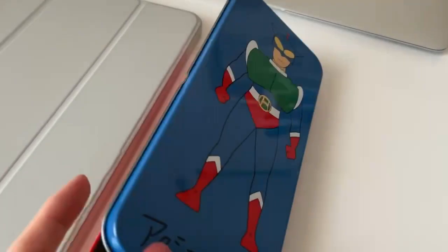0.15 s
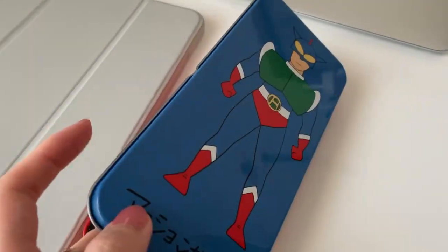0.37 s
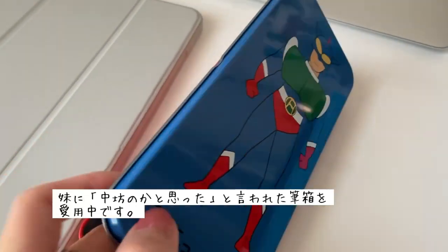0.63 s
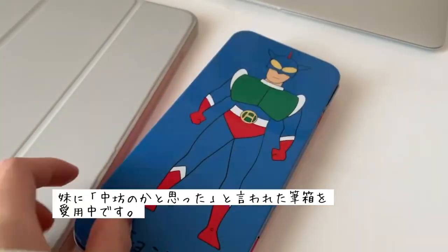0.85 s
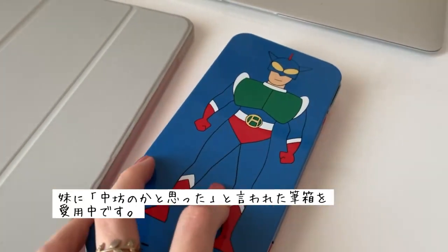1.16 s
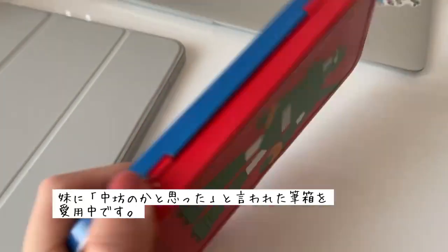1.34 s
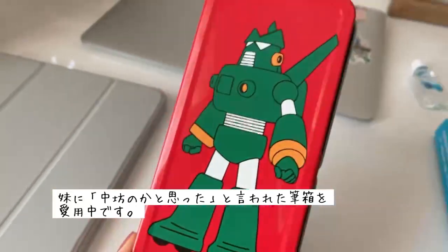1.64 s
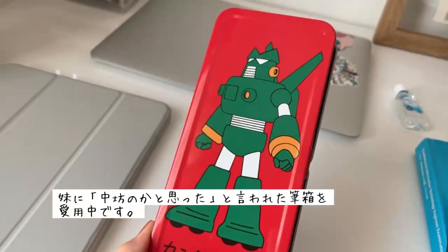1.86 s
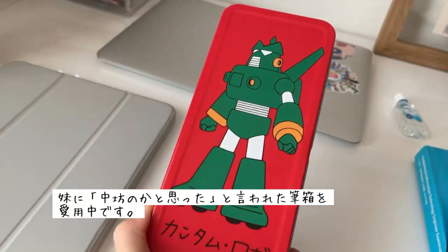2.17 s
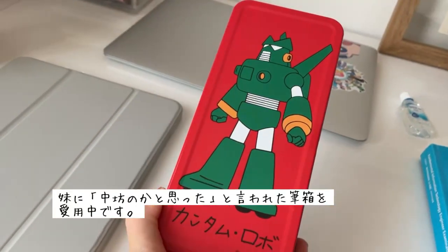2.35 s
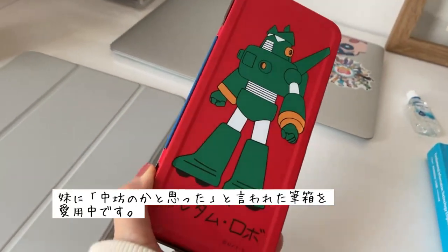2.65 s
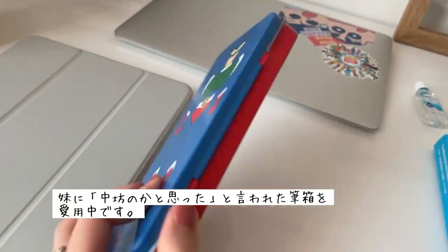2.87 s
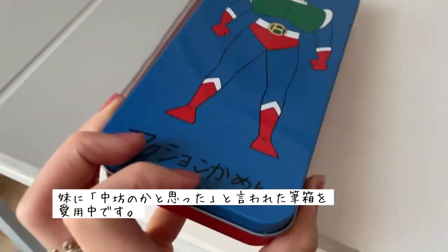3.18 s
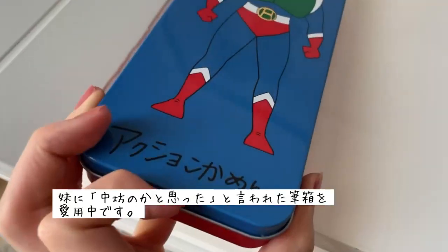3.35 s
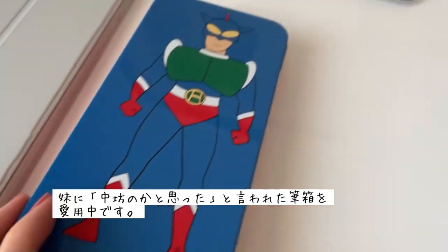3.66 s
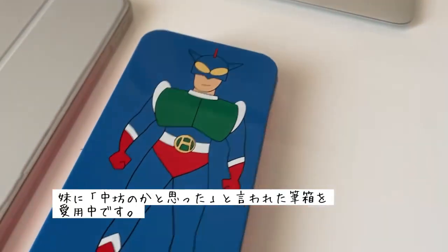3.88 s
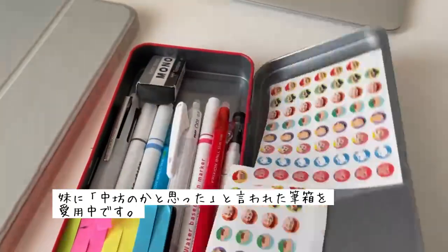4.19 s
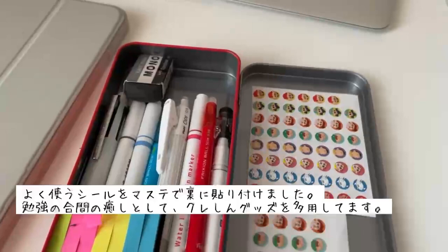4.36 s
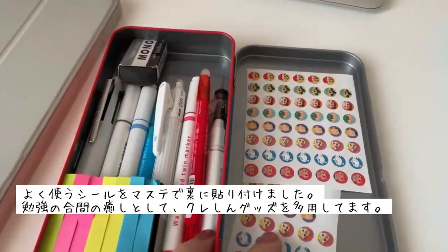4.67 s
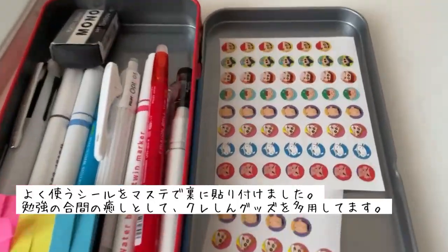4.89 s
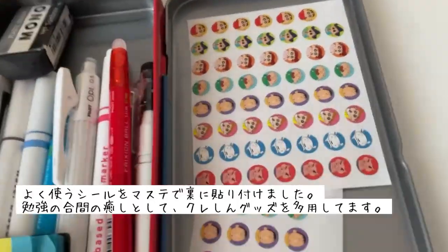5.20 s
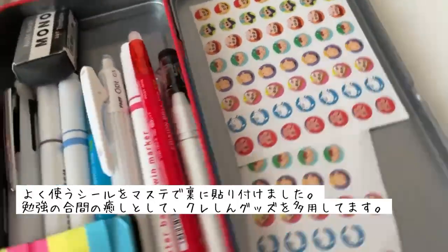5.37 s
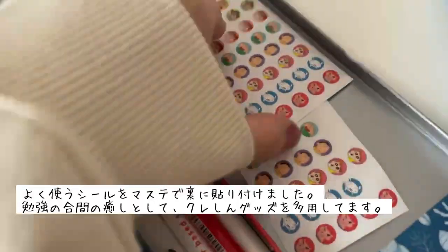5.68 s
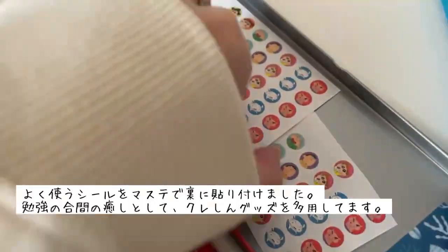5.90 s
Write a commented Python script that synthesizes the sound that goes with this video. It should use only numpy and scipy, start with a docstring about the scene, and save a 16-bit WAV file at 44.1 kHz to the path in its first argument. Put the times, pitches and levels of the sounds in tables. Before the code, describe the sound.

In a small quiet room, very close to a phone microphone, a thin metal pencil tin is closed with a light clack. Fingers bump and rub it, then loose pens tumble hollowly inside as it is flipped twice, with a quiet pause between. It lands on the desk with a strong knock, then opens with bright clacks and ticks, followed by faint paper rubbing and one last sharp lid clack.

```python
"""A sheet-metal pencil tin is shut, turned over twice, put down on a desk and opened, close to a phone.
Shut, it knocks hollowly as the pens tumble; open, its lid and rim clack brightly.
Each blow is a burst of noisy contact force that rings the damped modes of the panels.
Fingers tap and rub the metal, stirring the pens; paper slides over it: noise shaped by uneven slips.
The small quiet room adds a short decaying noise tail and a faint rumble of coloured noise."""
import sys
import numpy as np
from scipy import signal
from scipy.fft import rfft, irfft
from scipy.io import wavfile
from scipy.ndimage import uniform_filter1d

SR = 44100
rng = np.random.default_rng(int(sys.argv[2]) if len(sys.argv) > 2 else 0)


def dump_mix(stems):
    """Bounce the given channels to the path in sys.argv[1] as a 16-bit WAV at rate SR."""
    frames = np.atleast_2d(stems).T  # one column per channel
    limited = np.clip(frames, -1, 1)  # hard clip at full scale
    pcm = np.round(limited * 32767).astype(np.int16)
    wavfile.write(sys.argv[1], SR, pcm)


N = 265923


def undb(db):
    """Decibels to gain."""
    return 10 ** (np.asarray(db) / 20)


def unit(x):
    """Scale to rms 1."""
    return x / np.sqrt(np.mean(x ** 2) + 1e-20)


def band(x, lo_hz, hi_hz, order=2):
    """Causal band-pass."""
    edges_hz = [lo_hz, min(hi_hz, .48 * SR)]
    return signal.sosfilt(signal.butter(order, edges_hz, "band", fs=SR, output="sos"), x)


def on_bins(hz, values, count):
    """Points joined on a log-frequency axis, one value per FFT bin."""
    bins_hz = np.fft.rfftfreq(count, 1 / SR)
    return np.interp(np.log(bins_hz + 1), np.log(hz), values)


def colour(x, points):
    """Weight the spectrum by a curve through (frequency [Hz], level [dB]) points; rms 1."""
    gain = undb(on_bins(*np.transpose(points), N))
    return unit(irfft(rfft(x) * gain, N))


def pair(count, apart_db):
    """Noise at two ports: a shared part and a part of opposite sign."""
    mid, side = rng.standard_normal((2, count))
    return mid + undb(apart_db) * side * np.array([[1], [-1]])


def add(out, start_s, db, sound):
    """Mix a sound in at its moment and level."""
    start = int(start_s * SR)
    part = sound[:, :N - start]
    out[:, start:start + part.shape[1]] += undb(db) * part


# room rumble spectrum: (frequency [Hz], relative level [dB])
RUMBLE_SPECTRUM = [(15, -8.5), (30, -9), (50, -3), (68, 7.5), (100, -6), (150, -15.5), (300, -24.5),
                   (600, -35), (2000, -43.5), (8000, -51.5), (16000, -59)]
RUMBLE_DB = -59


def rumble():
    """Steady noise, weighted to the lows, nearly alike at both ports."""
    return undb(RUMBLE_DB) * colour(pair(N, apart_db=-13.0), RUMBLE_SPECTRUM)


def friction(grain_db, catch_db, apart_db):
    """Noise whose level steps with tiny uneven slips and wavers as the surfaces catch, some 55 times a second."""
    slips = np.repeat(rng.exponential(size=N // 40 + 1), 40)[:N]
    catches = np.repeat(rng.standard_normal(N // 800 + 1), 800)
    catches = uniform_filter1d(catches, 300)[:N]
    level_db = grain_db * np.minimum(slips, 5) + catch_db * catches
    return pair(N, apart_db) * undb(level_db)


def strokes(starts_s, lengths_s, levels_db, attack_s, release_s):
    """Gain of movements that swell, hold and fade; attack and release each span 30 dB."""
    t = np.arange(0, N, 64) / SR
    gain = 0
    for start_s, length_s, db in zip(starts_s, lengths_s, levels_db):
        before = np.maximum((start_s - t) / attack_s, 0)
        after = np.maximum((t - start_s - length_s) / release_s, 0)
        gain = np.maximum(gain, undb(db - 30 * (before + after)))
    return np.interp(np.arange(N) / SR, t, gain)


# sliding spectrum: (frequency [Hz], relative level [dB])
SLIDE_SPECTRUM = [(1000, -13.5), (1900, 2.5), (3000, 1.5), (4200, 1), (6000, -2.5), (8000, -2),
                  (11000, -5.5), (13500, -7.5), (14500, -15)]
# paper and sleeve sliding over the metal: (start [s], length [s], level [dB])
SLIDES = [(.01, 0.18, -63), (0.312, .04, -65), (0.68, 0.34, -76), (1.439, 0.084, -47.5), (4.2, 0.1, -53),
          (4.406, 0.022, -47.5), (4.712, 0.033, -69.5), (5.481, .1, -55), (5.604, 0.17, -71.5),
          (5.947, 0.066, -74)]


def sliding():
    """Paper and sleeve rub the metal: friction noise plus tiny ticks of snagging fibres."""
    snags_per_s = 220
    snags = (rng.random(N) < snags_per_s / SR) * rng.standard_normal(N)
    rubbing = unit(friction(grain_db=1.5, catch_db=1.2, apart_db=-8.5))
    slide = colour(rubbing + undb(-15) * unit(snags), SLIDE_SPECTRUM)
    return slide * strokes(*np.transpose(SLIDES), attack_s=.16, release_s=0.11)


def chatter(t, rise_s, t60_s, quickening, grain_db):
    """Contact force: builds, then fades unevenly, dropping faster and faster towards its end."""
    swell = np.minimum(t / max(rise_s, 1e-4), 1)
    age = np.maximum(t - rise_s, 0) / t60_s
    steps = np.repeat(rng.standard_normal(len(t) // 32 + 1), 32)[:len(t)]
    unevenness = undb(grain_db * steps)
    fade = undb(-60 * (age + quickening * age ** 2))
    return pair(len(t), apart_db=-10.5) * unevenness * swell * fade


def ring(force, modes, ring_db, damping):
    """Force through a panel: the direct crack plus modes whose shares depend on the spot."""
    t = np.arange(SR // 12) / SR
    hz, t60_s, db = np.transpose(modes)[:, :, None]
    spot, detune = rng.standard_normal((2, len(modes), 1))
    # hand and contents damp every mode by 60 dB within 100 cycles
    decay_per_s = np.log(1000) * np.maximum(damping / t60_s, hz / 100)
    size = undb(db + ring_db + 2 * spot) * 2 * decay_per_s / SR
    waves = np.cos(2 * np.pi * hz * (1 + 0.012 * detune) * t)
    response = np.sum(size * np.exp(-decay_per_s * t) * waves, axis=0)
    response[0] += 1  # direct crack
    return signal.fftconvolve(force, response[None])[:, :force.shape[1]]


def shimmer(x, dense_db, t60_s):
    """Countless weak modes of thin sheet: a short dense ring that differs from spot to spot."""
    t = np.arange(SR // 30) / SR
    dense = unit(rng.standard_normal(len(t)) * undb(-60 * t / t60_s))
    response = undb(dense_db) * dense / np.sqrt(len(t))
    response[0] += 1
    return signal.fftconvolve(x, response[None])[:, :x.shape[1]]


# tin and desk moving together: (frequency [Hz], t60 before damping [s], level before ring gain [dB])
DESK_MODES = [(91, 0.028, -2.5), (140.4, 0.21, 10.5), (243, 0.038, -4), (324, 0.012, 1.5)]


def knock(modes, ring_db, damping, rise_s, t60_s, body_hz, thump_db, clack_db, tick_db):
    """One blow: hollow body, panel clack, contact tick and a slower low thump; dB relative to body."""
    t = np.arange(SR // 7) / SR
    force = chatter(t, rise_s, t60_s, quickening=.09, grain_db=2.6)
    metal = ring(force, modes, ring_db, damping)
    bright = shimmer(metal, dense_db=-4, t60_s=.012)
    body = band(metal, 280, 2200, order=3)
    body = band(body, body_hz / 1.32, body_hz * 1.427, order=1)
    clack = band(bright, 1550, 3700, order=3)
    tick = band(bright.mean(axis=0), 4800, 23000, order=3)
    tick = band(tick, 1800, 4200, order=1)
    # tin, hand and desk move as a whole, more slowly
    push = chatter(t, rise_s + 0.0044, t60_s + 0.022, quickening=.22, grain_db=2)
    thump = band(ring(push, DESK_MODES, ring_db=8.0, damping=0.98), 50, 300)
    parts = unit(body) + undb(thump_db) * unit(thump)
    parts += undb(clack_db) * unit(clack) + undb(tick_db) * unit(tick)
    return parts * np.sqrt(SR / 100 / len(t))  # body energy equals rms 1 over 10 ms


def on_desk(blows, strike):
    """Blows to the tin resting on the desk: the stronger the thump, the lower the body."""
    body_hz_at_0db_thump, thump_db_per_octave = 667, 43.5
    out = np.zeros((2, N))
    for start_s, db, rise_s, t60_s, thump_db, clack_db, tick_db in blows:
        body_hz = body_hz_at_0db_thump * 2 ** (-thump_db / thump_db_per_octave)
        add(out, start_s, db, strike(rise_s, t60_s, body_hz, thump_db, clack_db, tick_db))
    return out


# open panels: (frequency [Hz], t60 before damping [s], level before ring gain [dB])
OPEN_MODES = [(533, 0.038, 8.5), (741, 0.099, 2), (1110, .06, -0.5), (1174, 0.02, 6.5), (2090, 0.15, -1.5),
              (2030, 0.024, 2), (2426, 0.009, 7.5), (2662, 0.05, 11.5), (2973, 0.016, 6),
              (3470, 0.034, 5.5), (4607, 0.045, 3), (5575, 0.049, -1), (6600, 0.038, 5.5),
              (7300, 0.026, -1.5), (7900, .02, -6), (9910, 0.014, 1.5), (11100, 0.025, -45),
              (11900, 0.023, -17.5), (14700, .015, 14.5)]


def open_knock(rise_s, t60_s, body_hz, thump_db, clack_db, tick_db):
    """Blow on the open tin: lying on the desk, it rings less."""
    return knock(OPEN_MODES, 4, 1.4, rise_s, t60_s, body_hz, thump_db, clack_db, tick_db)


# lid and rim of the open tin: (time [s], body level over 10 ms [dB], force rise [s], force t60 before
# quickening [s], thump [dB re body], clack [dB re body], tick [dB re body])
LID_CLACKS = [(.047, -47.5, 0.0016, 0.064, 7.5, 6, -2.5), (0.1723, -50.5, 0.0006, 0.082, 8.5, -5.5, -9),
              (.307, -31.5, 0.011, 0.027, -5.5, -1.5, -4.5), (.326, -37, 0.011, 0.032, -3, 1.5, -3.5),
              (4.06, -37.5, 0.0029, 0.11, 2, -7.5, -13), (4.131, -38, 0.0031, 0.086, -13.5, -4, -1.5),
              (4.148, -39, 0.0095, 0.042, 1, -15, -26), (4.204, -48, 0.0024, 0.061, 9, 10, 5),
              (4.336, -38.5, 0.00017, 0.065, -0.5, 7.5, 3), (4.4876, -30, 0.00098, 0.035, -9, 11, 0.5),
              (4.584, -49.5, 0.00061, 0.025, -6, 3, -2.5), (4.6002, -30.5, 0.00023, 0.063, -7, 8.5, -2),
              (4.6171, -35, .0005, 0.039, 0.5, 10, -2), (5.782, -44.5, 0.0057, .028, -12.5, 2, -13),
              (5.7899, -25, 0.00037, 0.042, -6.5, 10, 5.5), (5.809, -39, 0.0023, .049, 0, 5, 1),
              (5.8396, -49.5, 0.002, 0.1, -3, -1, -11), (5.8745, -51, 0.0079, 0.082, -9, 5.5, -3),
              (6.005, -64, .007, 0.19, -9, 11.5, -1)]


def lid_clacks():
    """Lid and rim meet and ring the open panels."""
    return on_desk(LID_CLACKS, open_knock)


# hinge, pen clips, sticker sheet: (time [s], level before body offset [dB], force t60 before quickening [s])
TICKS = [(0.1081, -40.5, 0.021), (.1407, -40.5, 0.032), (0.7723, -51, 0.042), (4.1874, -41, 0.041),
         (4.2828, -49, 0.0044), (4.303, -35, 0.0027), (4.32, -48.5, 0.0033), (4.4247, -44.5, 0.0086),
         (4.448, -49, 0.03), (5.2969, -57.5, 0.11), (5.4223, -55, 0.051), (5.5617, -52, 0.046),
         (5.6014, -51, 0.011)]
TICK_BODY_OFFSET_DB = -13


def ticks():
    """Light, hard contacts that hardly move the body of the tin or ring its panels."""
    out = np.zeros((2, N))
    for start_s, db, t60_s in TICKS:
        tick = knock(OPEN_MODES, ring_db=-8.5, damping=1.4, rise_s=0.00087, t60_s=t60_s,
                     body_hz=740, thump_db=4, clack_db=11.5, tick_db=12)
        add(out, start_s, db + TICK_BODY_OFFSET_DB, tick)
    return out


# shut panels: (frequency [Hz], t60 before damping [s], level before ring gain [dB])
SHUT_MODES = [(484, 0.03, 3.5), (454, 0.021, -0.5), (631, 0.014, -5.5), (747, 0.042, 1.5),
              (886, 0.076, -3.5), (1000, 0.086, -6), (1110, 0.03, -1), (1452, 0.063, -0.5),
              (1870, 0.079, -4), (1975, 0.047, -3), (2120, 0.028, 6), (2366, .045, 5.5), (2510, 0.017, 6.5),
              (2890, 0.057, -1), (3690, 0.098, -3), (4270, .03, -5.5), (4960, 0.047, -2),
              (6120, 0.079, -2.5), (9600, 0.0022, -4.5), (11880, 0.06, -6.5), (12560, 0.011, -0.5),
              (15400, 0.0036, 6.5)]


def shut_knock(rise_s, t60_s, body_hz, thump_db, clack_db, tick_db):
    """Blow on the shut tin: its panels ring more freely."""
    return knock(SHUT_MODES, 7, 1.25, rise_s, t60_s, body_hz, thump_db, clack_db, tick_db)


def jostle(rub_gain):
    """Loose pens nudge the tin at random moments, as strongly as the hand rubs it."""
    nudges, db_re_rub = 36, 3.5
    out = np.zeros((2, N))
    for when in rng.random(nudges):
        nudge = shut_knock(rise_s=.002, t60_s=.05, body_hz=750, thump_db=-7, clack_db=-7.5, tick_db=-14.5)
        add(out, when * N / SR, db_re_rub, rub_gain[int(when * N)] * nudge)
    return out


# hand takes hold and shifts the tin: (start [s], length [s], soft bumping [dB], finger rubbing [dB])
GRIPS = [(0.147, 0.097, -59, -65), (0.704, 0.12, -59, -68.5), (.83, .05, -54.5, -62),
         (0.931, 0.057, -40, -48.5), (1.1, 0.044, -52, -76), (1.187, 0.13, -55.5, -80),
         (1.303, 0.3, -56, -50), (1.627, 0.13, -77, -76), (2.79, 0.067, -79.5, -74.5),
         (2.873, 0.19, -58.5, -56), (3.066, 0.23, -58.5, -49), (3.558, 0.35, -62.5, -61.5),
         (3.869, 0.074, -58, -62.5), (3.997, 0.12, -56.5, -51), (4.229, 0.18, -59.5, -57.5),
         (4.633, 0.2, -68, -83), (5.308, 0.049, -57, -70.5), (5.428, .09, -67.5, -70.5),
         (5.566, 0.056, -51, -57), (5.949, 0.07, -69.5, -70)]


def gripping():
    """The hand bumps the tin as a whole, rubs its panels by friction and stirs the pens."""
    starts_s, lengths_s, *levels_db = np.transpose(GRIPS)
    bump_gain, rub_gain = (strokes(starts_s, lengths_s, db, attack_s=0.044, release_s=0.035)
                           for db in levels_db)
    bump_force = friction(grain_db=0, catch_db=2.0, apart_db=-16.5)
    bump = unit(band(ring(bump_force, DESK_MODES, ring_db=1.5, damping=2.4), 61, 320))
    rub_force = friction(grain_db=2, catch_db=4.0, apart_db=-6.5)
    rub = unit(band(ring(rub_force, SHUT_MODES, ring_db=5.5, damping=1.), 260, 1250, order=3))
    return bump * bump_gain + rub * rub_gain + jostle(rub_gain)


# soft fingertips landing: (time [s], body level over 10 ms [dB], force t60 before quickening [s])
TAPS = [(0.7007, -66.5, 0.069), (0.8341, -58, .07), (1.0543, -50.5, 0.19), (1.126, -57.5, .035),
        (1.187, -60.5, 0.025), (1.229, -53, 0.081), (1.734, -63.5, 0.054), (2.7779, -63.5, 0.056),
        (3.398, -65, .085), (3.928, -48, 0.11), (4.0164, -52, 0.046), (5.2968, -60, 0.16),
        (5.5606, -54.5, 0.081), (5.9613, -61, 0.037)]


def taps():
    """Soft fingertips land on the tin: mostly thump, little metal."""
    out = np.zeros((2, N))
    for start_s, db, t60_s in TAPS:
        tap = shut_knock(rise_s=.0018, t60_s=t60_s, body_hz=557, thump_db=5.5, clack_db=-11.5, tick_db=-19)
        add(out, start_s, db, tap)
    return out


# shut tin pressed and set down: (time [s], body level over 10 ms [dB], force rise [s], force t60 before
# quickening [s], thump [dB re body], clack [dB re body], tick [dB re body])
DESK_BLOWS = [(.917, -31.5, .0046, 0.15, -27, -8, -15.5), (.947, -35, .001, 0.13, -7.5, -4, -9.5),
              (1.0815, -30, 0.00085, 0.025, -5.5, -2, -10), (3.641, -34.5, .0016, .047, -4.5, 1.5, -10),
              (3.785, -31.5, .0004, 0.068, -28, -5, -24.5), (3.791, -21, .0056, .067, -8.5, -4.5, -16.5),
              (3.8085, -9.5, .0022, .053, -9, -4.5, -8), (3.826, -22.5, .0033, 0.013, -7.5, -1.5, -4.5)]


def desk_blows():
    """The shut tin knocks as it is pressed and set down on the desk."""
    return on_desk(DESK_BLOWS, shut_knock)


# pens hitting the shut tin turned in the air: (time [s], body level over 10 ms [dB], force rise [s],
# force t60 before quickening [s], body centre [Hz], hardness [dB])
PEN_HITS = [(1.306, -28.5, 0.0094, .05, 685, -2), (1.326, -31.5, 0.0025, 0.18, 840, -1),
            (1.357, -36.5, 0.0055, .015, 945, 13.5), (1.374, -40, 0.0016, 0.17, 559.6, -3.5),
            (1.418, -39, 0.0069, .14, 640, 1), (1.463, -28.5, 0.0075, .07, 600, -3),
            (1.478, -22.5, 0.013, .065, 704, -3), (1.501, -24, .005, 0.033, 897, -1.5),
            (1.5076, -13, 0.00091, .055, 993.6, 3), (1.528, -21.5, .009, .018, 857.5, -0.5),
            (1.559, -41, 0.0014, .065, 660, 0), (1.629, -37.5, 0.0015, .09, 961, -1),
            (2.2803, -57, 0.00099, .03, 831, 7.5), (2.3302, -58.5, 0.00091, .05, 978, -12),
            (2.6345, -58.5, 0.0017, 0.081, 890, 3), (2.657, -40, 0.00045, .066, 664.6, -11),
            (2.873, -34, 0.00094, .094, 843, 2.5), (2.8995, -30.5, 0.0007, .11, 660, -9.5),
            (2.942, -24, 0.00013, .063, 740, 5), (2.958, -30.5, 0.003, .096, 695, 2.5),
            (3.039, -29.5, 0.011, .09, 790, 0), (3.086, -27, 0.013, .02, 960, -5),
            (3.1122, -10, 0.001, .025, 920, 0), (3.1527, -26, .0005, .025, 1014, -4.5),
            (3.218, -31.5, .003, 0.085, 900, -4.5), (3.237, -40.5, 0.0017, 0.12, 880, 0.5),
            (3.2555, -32.5, 0.00059, .03, 734, 5.5), (3.572, -28, .007, .12, 788, -1),
            (3.618, -24.5, 0.0079, .057, 610, -8)]
PEN_THUMP_DB = -20  # in the air a pen has little weight to move
SOFT_CLACK_DB, SOFT_TICK_DB = -6, -13.5  # re body at hardness 0


def tumbling():
    """Pens fall against the walls of the held tin; harder contact lifts clack and tick."""
    out = np.zeros((2, N))
    for start_s, db, rise_s, t60_s, body_hz, hard_db in PEN_HITS:
        clack_db, tick_db = SOFT_CLACK_DB + hard_db, SOFT_TICK_DB + hard_db
        add(out, start_s, db, shut_knock(rise_s, t60_s, body_hz, PEN_THUMP_DB, clack_db, tick_db))
    return out


def room(x, wet_db, boom_db, t60_s, boom_t60_s):
    """Short, dull tail from the walls, different at each port; the lows stay longer."""
    t = np.arange(SR // 2) / SR
    delayed = t > .008
    tail = band(rng.standard_normal((2, len(t))), 150, 4000, order=1) * undb(-60 * t / t60_s) * delayed
    boom = band(pair(len(t), apart_db=-15.0), 61, 200) * undb(-60 * t / boom_t60_s) * delayed
    walls = (undb(wet_db) * unit(tail) + undb(boom_db) * unit(boom)) / np.sqrt(len(t))
    return signal.fftconvolve(x, walls, axes=1)[:, :N]


def scene():
    """The handled tin, its echo and the rumble of the room."""
    tin = sliding() + lid_clacks() + ticks() + gripping() + taps() + desk_blows() + tumbling()
    echo = room(tin, wet_db=-31.0, boom_db=-45.5, t60_s=0.16, boom_t60_s=0.29)
    return tin + echo + rumble()


# the phone's two ports: (frequency [Hz], left minus right [dB], left lead [rad])
PORTS = [(60, .3, 0), (300, 2.5, .05), (700, 3.5, .35), (1400, 4.4, .4), (1900, 2, .3), (2400, 3.8, .8),
         (3200, 4, .7), (3900, 5.3, -.2), (4500, 5.3, 0), (5000, 5.8, 1.1), (6100, 1.2, -.3),
         (7100, 1.5, -1.6), (8000, .5, -np.pi), (9100, 0, -np.pi), (10600, 0, -2 * np.pi),
         (12700, 0, -2 * np.pi), (13300, .5, -8.7), (14000, 0, -3 * np.pi)]
TOP_HZ = 15850


def record(dry):
    """The ports differ in level and phase; the loudest peaks are rounded and the top is cut."""
    hz, *columns = np.transpose(PORTS)
    balance_db, lead_rad = (on_bins(hz, column, N) for column in columns)
    left = undb(balance_db / 2) * np.exp(1j * lead_rad)
    right = undb(-balance_db / 2)
    heard = irfft(rfft(dry) * np.array([left, right]), N)
    top_cut = signal.ellip(8, .2, 70, TOP_HZ, fs=SR, output="sos")
    return signal.sosfilt(top_cut, np.tanh(heard))


dry = scene()
out = record(dry)
dump_mix(out)
```